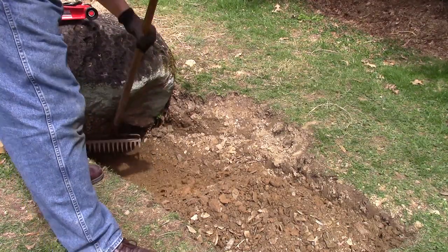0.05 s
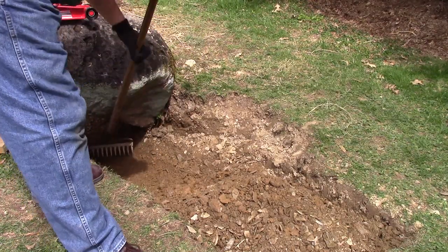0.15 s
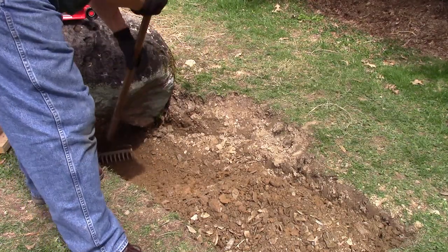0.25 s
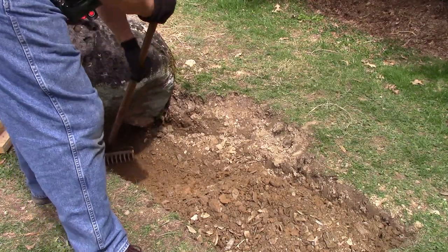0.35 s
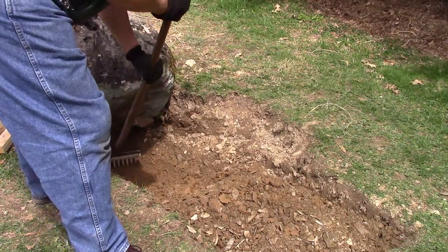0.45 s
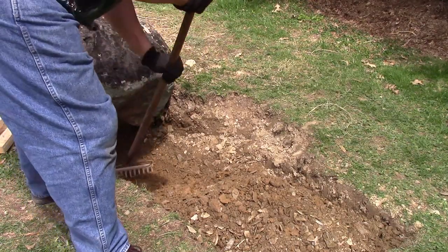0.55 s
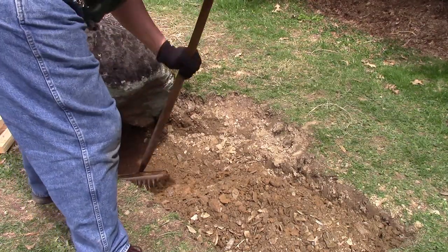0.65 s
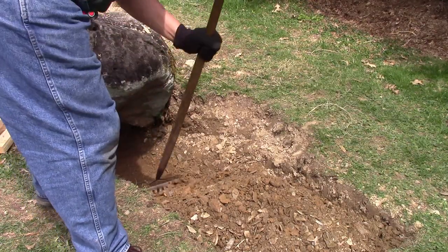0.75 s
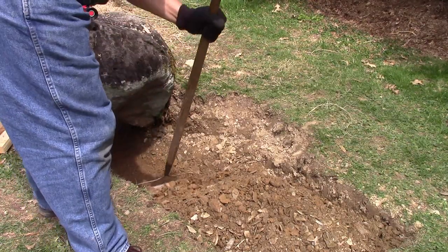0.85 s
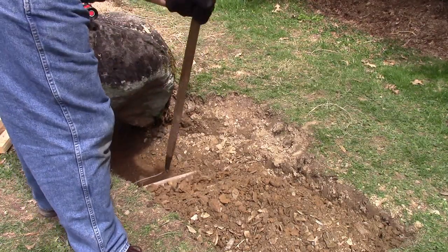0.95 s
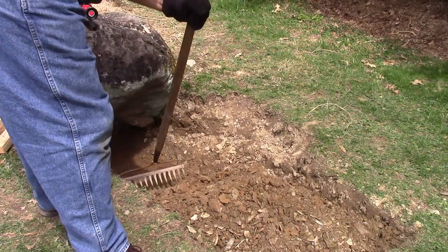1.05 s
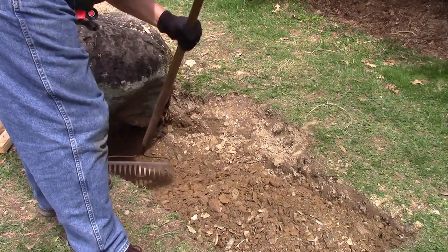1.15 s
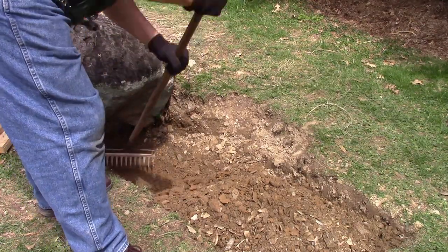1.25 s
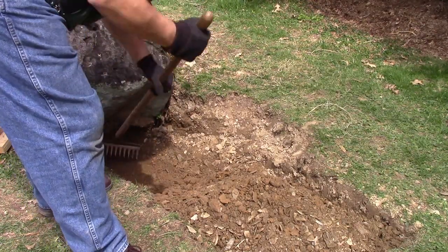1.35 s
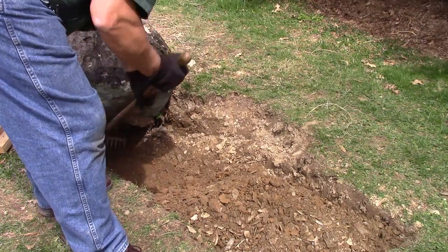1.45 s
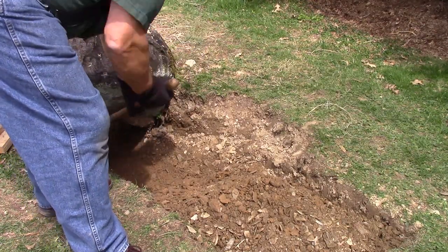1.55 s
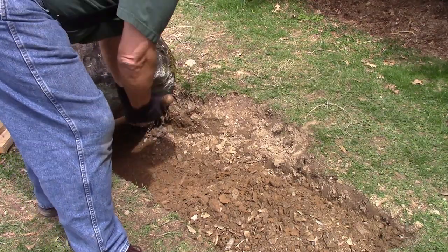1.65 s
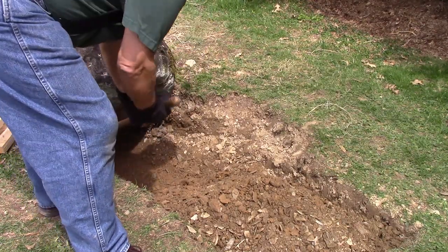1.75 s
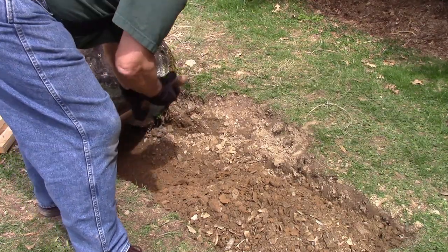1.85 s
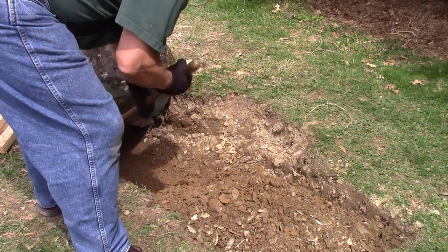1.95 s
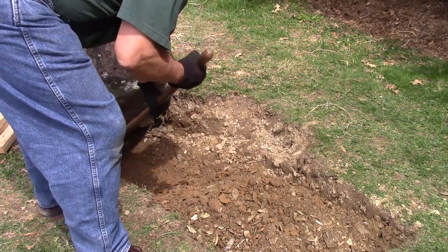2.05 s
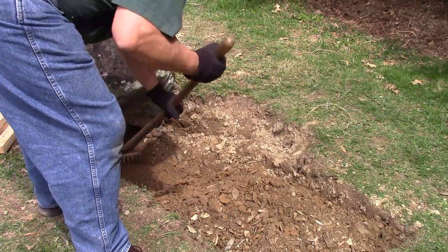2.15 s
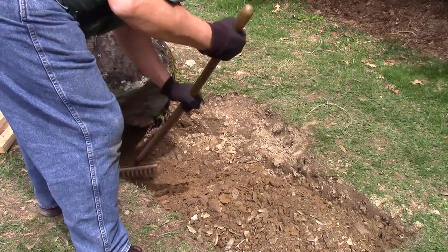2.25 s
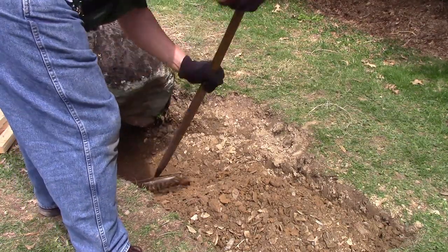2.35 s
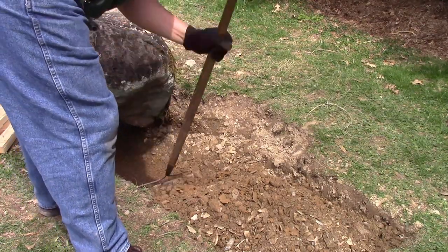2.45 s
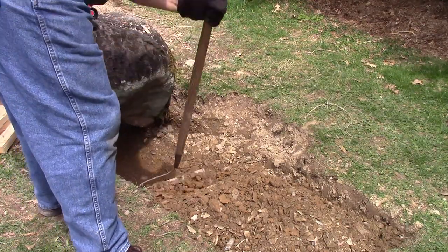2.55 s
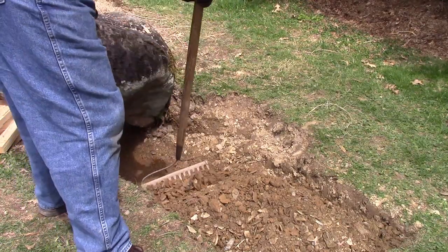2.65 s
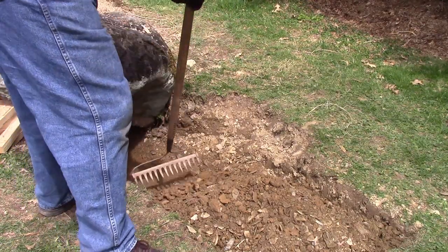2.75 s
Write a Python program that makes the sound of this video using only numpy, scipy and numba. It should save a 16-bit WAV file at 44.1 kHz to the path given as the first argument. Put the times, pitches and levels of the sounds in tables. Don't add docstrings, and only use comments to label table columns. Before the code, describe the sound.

A steel garden rake lands with a clank on dry dirt, scrapes through stones, lifts with faint glove squeaks and pebble ticks, then drags again, rattling and gritty; close stereo pickup in a quiet yard.

```python
import sys
import numpy as np
from scipy import signal
from scipy.fft import rfft, irfft
from scipy.io import wavfile
from scipy.ndimage import uniform_filter1d
from numba import njit

SR = 44100
rng = np.random.default_rng(int(sys.argv[2]) if len(sys.argv) > 2 else 0)


def amplitude_ratio(level_db):
    exponent = np.asarray(level_db, float) / 20
    return 10 ** exponent


def wav_record(signal):
    frames = np.transpose(np.atleast_2d(signal))
    bounded = np.clip(frames, -1, 1)
    quanta = np.round(bounded * 32767).astype(np.int16)
    wavfile.write(sys.argv[1], SR, quanta)


N = 121275
MID_ONLY = np.array([[1], [0]])


def unit(x):
    return x / np.sqrt(np.mean(x ** 2))


def curve(rows, col):
    rows = np.array(rows, float)
    return np.interp(np.arange(N) / SR, rows[:, 0], rows[:, col], left=-120, right=-120)


def on_log(table, hz):
    table = np.array(table, float)
    return np.interp(np.log(np.maximum(hz, 1)), np.log(table[:, 0]), table[:, 1])


def colour(x, table):
    hz = np.fft.rfftfreq(N, 1 / SR)
    return irfft(rfft(x) * amplitude_ratio(on_log(table, hz)), N)


def walk(rate_hz):
    k = int(SR / rate_hz)
    steps = np.repeat(rng.standard_normal(N // k + 1), k)
    return 1.2 * uniform_filter1d(uniform_filter1d(steps, k), k)[:N]


def clicks(times, sizes):
    return np.bincount(np.clip(times * SR, 0, N - 1).astype(int), sizes, N)


def ring(x, hz, t60):
    r = np.exp(-np.log(1000) / (t60 * SR))
    w = 2 * np.pi * min(hz, .45 * SR) / SR
    return signal.lfilter([0, r * np.sin(w)], [1, -2 * r * np.cos(w), r * r], x)


@njit
def chips(at, hz, cycles, size, side, count):
    out = np.zeros((2, count))
    for g in range(len(at)):
        turn = np.exp((2j * np.pi - 1 / cycles[g]) * hz[g] / SR)
        z = size[g] + 0j
        for i in range(at[g], min(count, at[g] + int(6 * cycles[g] * SR / hz[g]))):
            out[0, i] += z.imag
            out[1, i] += z.imag * side[g]
            z *= turn
    return out


# f/Hz, level/dB
AIR = [(12, -31), (20, 1), (95, -13.5), (133, -7.5), (441, -23.5), (535, -22.5), (1820, -25), (4000, -32.5),
       (15600, -41)]
# f/Hz, likeness [0..1]
AIR_ALIKE = [(30, 0.85), (300, 0.6), (2000, 0.6), (12000, 0.062)]


def air():
    alike = np.clip(on_log(AIR_ALIKE, np.fft.rfftfreq(N, 1 / SR)), 0, 1)
    mid, side = (rfft(colour(rng.standard_normal(N), AIR)) for _ in range(2))
    both = irfft(mid * np.sqrt(1 + alike) + np.array([[1], [-1]]) * side * np.sqrt(1 - alike), N)
    return unit(both) * amplitude_ratio(-48 + .5 * walk(7.04))


# t/s, length/s, squeak f/Hz, width/Hz, level/dB
GLOVE = [(.93, .07, 4500, 90, -56), (0.937, 0.054, 4150, 150, -59), (1.009, .1, 3020, 140, -58),
         (1.03, 0.11, 3330, 90, -60), (1.06, .06, 3800, 300, -62), (1.095, .03, 2040, 120, -53.5),
         (1.1, .08, 2500, 70, -60.5), (1.137, 0.22, 1690, 80, -58.5), (1.378, .07, 1770, 110, -59.5),
         (1.874, 0.023, 3640, 600, -53), (1.892, 0.068, 4350, 300, -52)]


def glove():
    t, out = np.arange(N) / SR, 0
    for start, length, hz, width_hz, db in GLOVE:
        swell = np.sin(np.pi * np.clip((t - start) / length, 0, 1)) ** .5
        squeak = unit(ring(rng.standard_normal(N), hz, np.log(1000) / (np.pi * width_hz)))
        out = out + squeak * swell * amplitude_ratio(db + 1.6 * walk(60.1))
    return out


# t/s, level/dB, f/Hz, ring t60/s
PEBBLES = [(0.38, -37, 7900, 0.0019), (0.8, -26, 15600, .008), (.878, -20.5, 7900, 0.00085),
           (1.005, -8.5, 6000, 0.00074), (1.006, -22.5, 1600, 0.0048), (1.068, -29, 6750, 0.00092),
           (1.258, -19.5, 4150, 0.0015), (.569, -22.5, 950, 0.061), (.71, -26, 920, 0.043),
           (.808, -31, 1500, 0.04), (2.407, -21, 2920, 0.047), (2.285, -26.5, 4000, 0.018),
           (0.54, -28, 210, 0.11), (0.62, -22, 265, 0.053), (1.535, -34.5, 1900, 0.004),
           (2.36, -15.5, 185, 0.06), (2.363, -18.5, 193, 0.082), (2.485, -19, 1150, 0.036),
           (2.49, -22.5, 1210, 0.028), (0.9, -22, 6000, 0.0011), (1, -27, 2150, .012),
           (2.17, -25, 1405, 0.033), (.926, -36, 255, 0.04), (1.6501, -40, 337, 0.06),
           (0.61, -34, 5300, 0.00087), (2.4925, -11.5, 8800, 0.0011), (2.505, -15.5, 7600, .012)]


def pebbles():
    four_hits = np.repeat(np.array(PEBBLES, float), 4, axis=0)
    start, db, hz, t60 = four_hits.T.reshape(4, -1, 4)
    bounce_s = np.array([0, .0004, .0017, .004])
    at = ((start + bounce_s) * SR).astype(np.int64).ravel()
    size = (amplitude_ratio(db) * np.array([0.34, -1.09, 0.53, 0.44])).ravel()
    cycles = (t60 * hz).ravel() / np.log(1000)
    return chips(at, hz.ravel(), cycles, size, 0 * size, N)[0]


GRAIN_PAN = 0.25
# f/Hz, level/dB per Hz
GRIT = [(1000, -6.5), (2500, -7.5), (7000, -6.5), (11000, -11.5), (15500, -26)]


def hiss():
    return np.array([unit(colour(rng.standard_normal(N), GRIT)) * share for share in (1, GRAIN_PAN)])


def gravel(times, sizes):
    luck = rng.standard_normal((len(times), 3))
    at = np.clip(times * SR, 0, N - 1).astype(np.int64)
    hz = np.clip(3500 * 2 ** (0.774 * luck[:, 0]), 800, .35 * SR)
    cycles = 6.05 / 3 * amplitude_ratio(6.3 * luck[:, 1])
    return chips(at, hz, cycles, sizes * amplitude_ratio(on_log(GRIT, hz) * 0.26), GRAIN_PAN * luck[:, 2], N)


def body(modes, times, sizes, spread_db, struck_hz=None):
    luck = rng.standard_normal((len(times), len(modes), 2))
    gain = amplitude_ratio(spread_db * luck[..., 0]) * np.sign(luck[..., 1])
    if struck_hz is not None:
        octaves = np.log2(np.array(modes)[:, 0] / struck_hz[:, None])
        gain = gain * (0.41 + np.exp(-(octaves / 0.18) ** 2))
    out = 0
    for k, (hz, db, t60) in enumerate(modes):
        out = out + amplitude_ratio(db) * ring(clicks(times, sizes * gain[:, k]), hz, t60)
    return out


# f/Hz, level/dB, t60/s
HEAD = [(196, -8, 0.065), (241.6, -8.5, 0.16), (371.6, -10.5, 0.074), (480.3, -4.5, 0.045),
        (600, -3, 0.038), (701, -5, 0.075), (825, 3, 0.024), (905, 4.5, 0.065), (1043, 3, 0.021),
        (1177, 0.5, 0.04), (1402, 5, 0.02), (1580, -5, 0.038), (1793, -5, 0.031)]


def ring_head(times, sizes, spread_db):
    return body(HEAD, times, sizes, spread_db)


# f/Hz, level/dB, t60/s
TINES = [(2104, 0, 0.012), (2376, -7, 0.035), (2816, -4, 0.033), (3124, -4.5, 0.022), (3500, 4.5, 0.0057),
         (4234, -4, 0.017), (4700, -5, 0.018), (5140, -7, 0.024), (7700, -13.5, 0.0085)]


def ring_tines(times, sizes, struck_hz=None):
    return body(TINES, times, sizes, 3.0, struck_hz)


def scattered(per_s, skew_db):
    luck = rng.random((int(per_s * N / SR), 2))
    return luck[:, 0] * N / SR, amplitude_ratio(-skew_db * np.log(luck[:, 1] + 0.0015))


# t/s, tine pressure as head rumble level/dB, dirt flow as grit level/dB
DRAGS = [
    [(0, -60, -51), (.1, -62, -59.5), (.2, -58, -54.5), (.225, -28, -42), (.285, -44, -52.5),
     (.32, -38, -47.5), (.36, -49, -54.5)],
    [(.44, -55, -74), (.47, -51, -56), (.6, -36, -45.5), (.7, -38, -44), (.84, -39.5, -39),
     (.88, -48, -49.5), (1.0, -57, -59.5)],
    [(1.0, -69, -58.5), (1.3, -70, -68.5), (1.62, -61, -61.5), (1.65, -42.5, -44), (1.7, -52, -54.5),
     (1.73, -46, -45), (1.79, -62, -52), (1.825, -70, -66)],
    [(1.86, -69, -56), (2.1, -45, -47.5), (2.25, -37, -43), (2.38, -32.5, -41), (2.5, -47, -36),
     (2.54, -55, -52), (2.62, -64, -55.5), (2.75, -63, -58.5)],
]


def drag():
    press, flow = (sum(amplitude_ratio(curve(rows, col)) for rows in DRAGS) for col in (1, 2))
    head = unit(ring_head(*scattered(500, 2.53), spread_db=0.0))
    times, tine_sizes = scattered(1500, 3)
    grit = unit(gravel(times, tine_sizes ** (2.5 / 3)))
    tines = unit(ring_tines(times, tine_sizes))
    steel = press * amplitude_ratio(-1.0 + 1.6 * walk(60)) * head + flow * amplitude_ratio(-4.5 + 2.7 * walk(50)) * tines
    dirt = amplitude_ratio(-5.5 + 2.0 * walk(50)) * grit + amplitude_ratio(-5 + 0.96 * walk(45.4)) * hiss()
    return steel * MID_ONLY + flow * dirt


# t/s, head level/dB, tines
# level/dB re head, grit level/dB re head, struck tine f/Hz
CATCHES = [(0.201, -3, -11.5, -27, 2300), (0.21, -7, -4, -31.5, 2520), (0.297, -31, 3, -16, 3800),
           (0.303, -23, -17, -28, 3300), (0.314, -24.5, -10, -30, 3280), (0.482, -25, -20, -27, 2770),
           (0.526, -23.5, -24, -22.5, 3610), (0.566, -16.5, -31, -52, 2100),
           (0.61, -21.5, -20, -24, 2510), (0.669, -11.5, -18.5, -28.5, 3730),
           (0.683, -23.5, -9, -17, 4380), (0.707, -21, -19, -27, 2840),
           (0.744, -21.5, -7.5, -36, 2930), (0.777, -20.5, -9, -10, 2760),
           (0.805, -19, -18, -15, 4010), (0.824, -14.5, -15, -21.5, 4270),
           (1.631, -30, 1.5, -7.5, 3360), (1.644, -30, 2, -22, 2200), (1.712, -25, 1, -45, 3000),
                  (1.879, -55, 12, -15, 3270), (1.953, -32.5, -0.5, -21, 2620),
                  (2.007, -27, -8.5, -22.5, 2860), (2.043, -31, -3, -17, 5040),
                  (2.077, -21.5, -6.5, -36, 3680), (2.133, -32.5, 2, -12, 2103),
                  (2.163, -25.5, -1, -15, 4170), (2.191, -20, -18, -18, 2250), (2.228, -24, -27, -20, 3300),
                  (2.283, -15, -3.5, -17, 3100), (2.361, -17.5, -20, -37, 2800),
                  (2.406, -18.5, 0.5, -9.5, 2680), (2.446, -15, -23, -9.5, 2750),
                  (2.475, -20, -2, -17.5, 2400), (2.486, -22, -4, -15, 2850), (2.553, -34, -24, -29, 2340),
                  (2.579, -29, -10, -21, 2070)]
SCUFFS = [(0.221, -19, -6, -29, 3200), (.462, -30, -20, -29, 2800), (.583, -26.5, -13, -26.5, 3290),
          (0.626, -24.5, -6, -21.5, 4000), (0.64, -24.5, -10, -19, 2820), (.69, -23.5, -8, -17.5, 2840),
          (.833, -30, -10, -13.5, 2990), (0.861, -32.5, -14, -20, 2800), (1.655, -39, 0, -14, 2180),
          (1.724, -33.5, 1.5, -19, 2800), (1.805, -39.5, -10, -18, 2100), (1.998, -31, -5, -23, 2860),
          (2.07, -25, -6, -23, 3120), (2.09, -23.5, -7, -25, 3680), (2.145, -32.5, -3, -12, 2100),
          (2.17, -27, -13, -20, 2100), (2.205, -26, -10, -13.5, 5000), (2.243, -24.5, -16, -19.5, 2400),
          (2.296, -28, -7, -12, 2800), (2.328, -20.5, -9, -17, 3000), (2.343, -21, -12, -16, 3500),
          (2.373, -25.5, -18, -18, 2270), (2.393, -29, -10, -17, 2320), (2.42, -22.5, -19, -20.5, 2800),
          (2.461, -23.5, -8, -16, 2800), (2.509, -31, -8, -15, 2400), (2.529, -39, -14, -13, 2030),
          (2.595, -38.5, -12, -14, 2060)]


def catches():
    rows = np.array([*CATCHES, *SCUFFS], float)
    is_catch = np.arange(len(rows)) < len(rows) - len(SCUFFS)
    length_s = np.where(is_catch, .013, .024)[:, None]
    knocks = 16
    luck = rng.random((len(rows), knocks, 2))
    late = ((np.arange(knocks) + luck[..., 0]) / knocks) ** 1.3
    times = (rows[:, :1] + late * length_s).ravel()
    swell = (1 - np.exp(-late / .12)) * np.exp(-late / 0.54)
    size = swell * amplitude_ratio(rows[:, 1:2] + 4.73 * luck[..., 1])
    head = amplitude_ratio(-20.5) * ring_head(times, size.ravel(), spread_db=4.0)
    tine_size = (size * amplitude_ratio(rows[:, 2:3])).ravel()
    tines = amplitude_ratio(-7.5) * ring_tines(times, tine_size, np.repeat(rows[:, 4], knocks))
    grit_size = (size * np.sin(np.pi * late) * amplitude_ratio(rows[:, 3:4] + 2.5)).ravel()
    puff = signal.lfilter([1], [1, -np.exp(-1 / (0.0038 * SR))], clicks(times, grit_size))
    spit = amplitude_ratio(-10.5) * uniform_filter1d(puff, size=90) * hiss()
    return (head + tines) * MID_ONLY + spit + amplitude_ratio(12.5) * gravel(times, grit_size)


def scene():
    mid, side = catches() + drag()
    mid = mid + pebbles() + glove()
    hz = np.fft.rfftfreq(N, 1 / SR)
    ports = np.array([[.5], [-.5]])
    low_cut = 1 / np.sqrt(1 + (163 / (hz + 1)) ** 4)
    treble = amplitude_ratio(ports * 3.5 * hz / 12000)
    lead = np.exp(2j * np.pi * hz * ports * 2.7e-5)
    heard = rfft(mid + 2 * ports * side) * treble * lead
    return irfft(heard * low_cut, N) + air()


def roll_off(x):
    return signal.sosfilt(signal.butter(12, 15730, fs=SR, output="sos"), x)


def record(dry):
    top_cut = signal.ellip(10, .2, 70, 15750, fs=SR, output="sos")
    mix = signal.sosfilt(top_cut, dry)
    return roll_off(mix)


dry = scene()
out = record(dry)
wav_record(out)
```